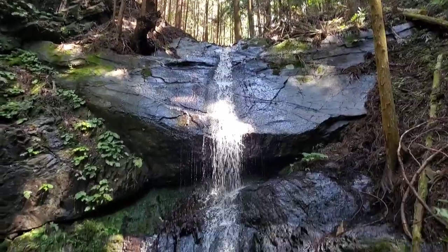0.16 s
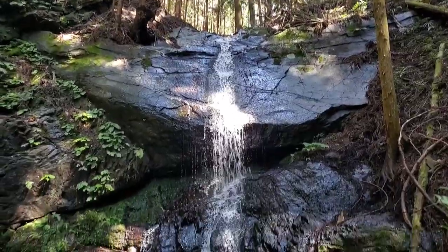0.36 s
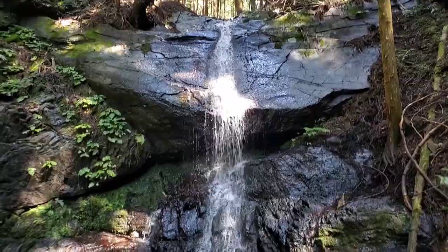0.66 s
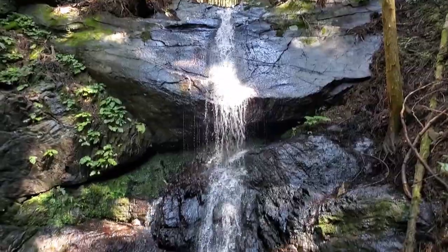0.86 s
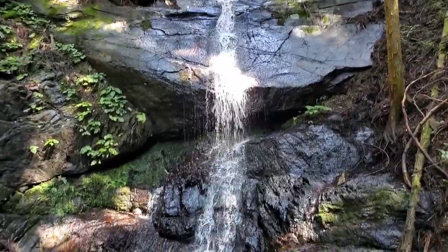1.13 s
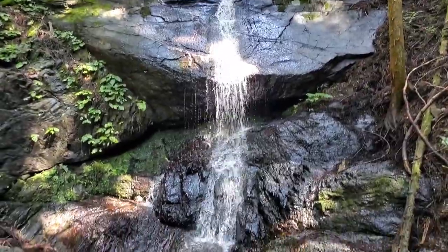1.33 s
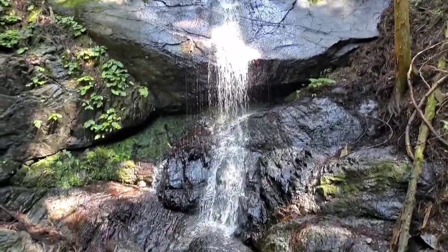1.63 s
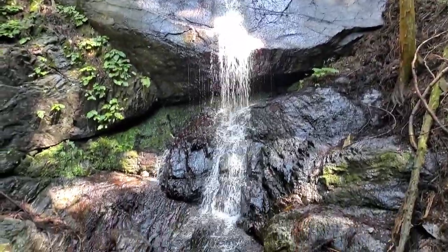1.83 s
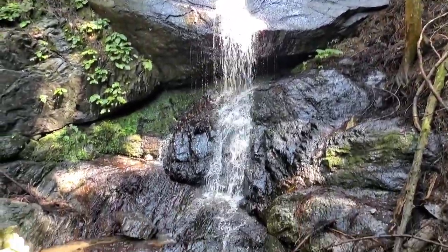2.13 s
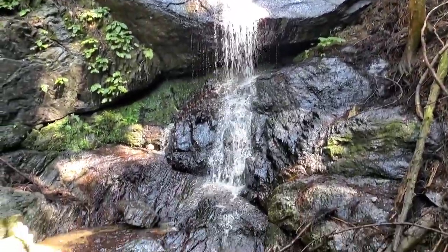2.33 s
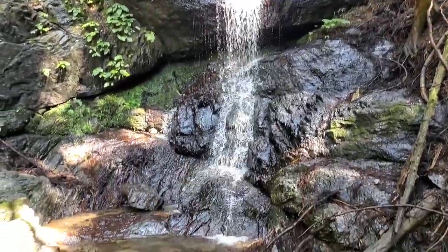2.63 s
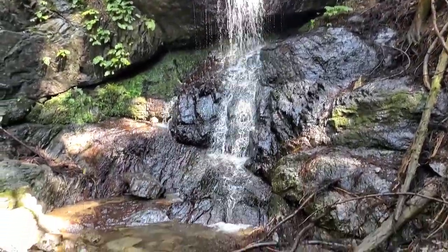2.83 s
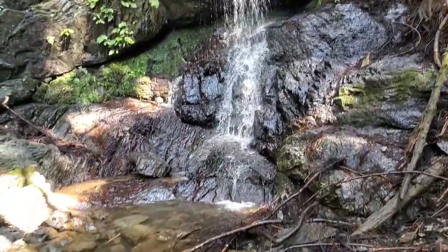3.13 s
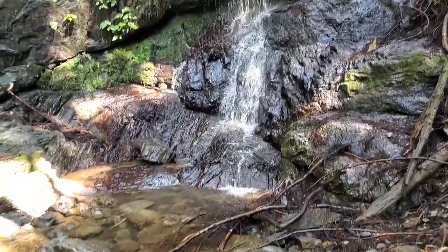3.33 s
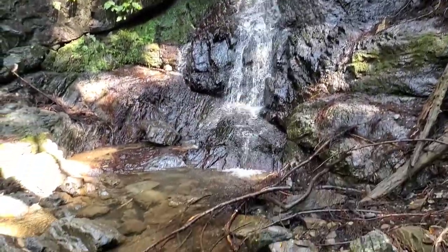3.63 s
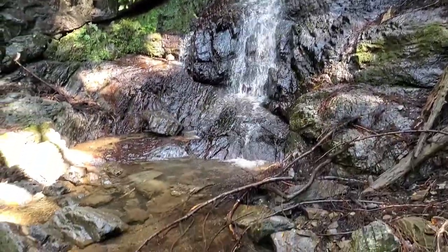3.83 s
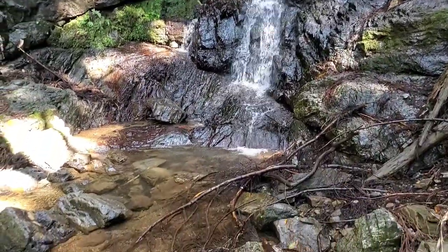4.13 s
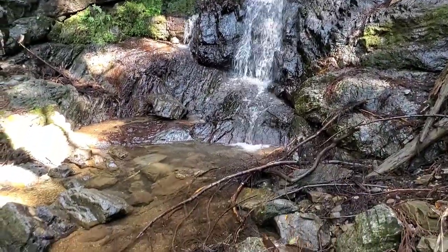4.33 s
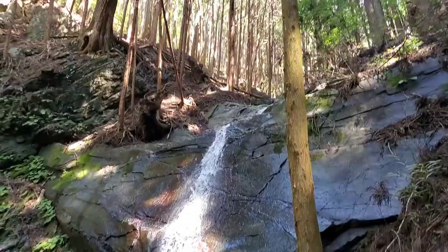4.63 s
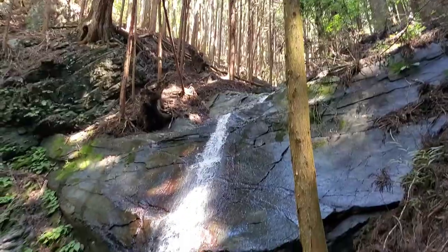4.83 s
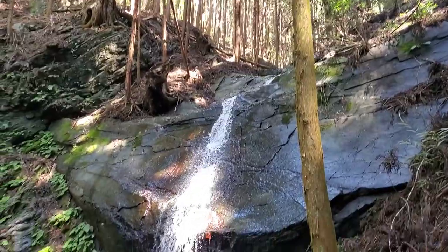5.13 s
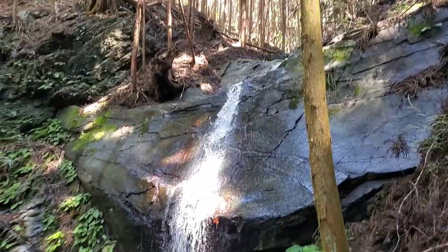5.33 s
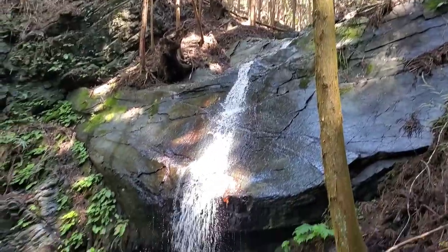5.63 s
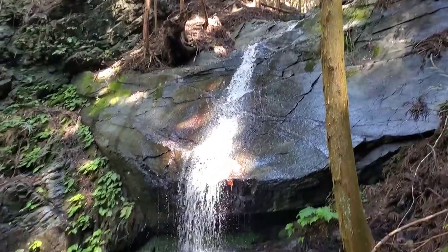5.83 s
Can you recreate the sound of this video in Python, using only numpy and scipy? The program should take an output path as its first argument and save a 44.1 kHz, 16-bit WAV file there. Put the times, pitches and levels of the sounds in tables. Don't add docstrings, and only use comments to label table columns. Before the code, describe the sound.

A small woodland waterfall heard from its pool: dense, bright splashing hiss with flickering surges, drops slapping rock, tiny clicks and a few soft low bubble thumps. Near 4.5 seconds the sound drops out for an instant and returns much quieter and thinner from the slope, then rises quickly after 5.3 seconds with faint wind. Handheld stereo microphone with automatic gain.

```python
import sys
import numpy as np
from scipy import signal
from scipy.io import wavfile
from scipy.ndimage import uniform_filter1d

SR = 44100
rng = np.random.default_rng(int(sys.argv[2]) if len(sys.argv) > 2 else 0)


def digitize_waveform(pressure):
    field = np.atleast_2d(pressure).T
    bounded = np.clip(field, -1, 1)
    quanta = np.round(bounded * 32767).astype(np.int16)
    wavfile.write(sys.argv[1], SR, quanta)


def volts(x):
    e = np.asarray(x, float) / 20
    return 10 ** e


N = 262836
SCENE_CHANGE_S = 4.5412


def waterfall():
    # hz, left_db, right_db (per Hz)
    foot_low = [(25, -37, -34), (45, -25, -21), (72, -8.5, -4.5), (110, -20, -18), (140, -10.5, -12),
                (168, -5, -1), (209, -6, -8), (250, -10.5, -4.5), (288, -9, -8), (378, -5, -2.5),
                (480, -6.5, -5), (610, -4.5, -2.0), (710, -6.5, -5), (970, -4, -2)]
    foot_high = [(1400, -1, 0), (1930, 0.5, 0.5), (2470, -2, 0.5), (2800, -3, 2.5), (3230, -2, 4),
                 (3930, -1.5, 1.5), (5060, -5, -1), (6300, -1.5, -0.5), (6880, -3.5, 2.5),
                 (7900, -6.5, -4.5), (12000, -4.5, -5.5), (13300, -5.5, -9), (14600, -3, -8),
                 (15300, -3, -8)]
    slope_low = [(25, -31.5, -28.0), (45, -28.0, -13.0), (75, -21.5, -2.5), (125, -21.0, -13.5),
                 (190, -12.5, -9.5), (260, -15.0, -12.5), (340, -14.5, -10.0), (500, -7.5, -6.5),
                 (650, -6.0, -3.5), (800, -7.5, -4.5), (1000, -5.0, -3.5)]
    slope_high = [(1600, 0.5, 0.5), (2150, 0.5, 3.0), (3000, -2.5, 2.0), (3600, -2.0, 3.0),
                  (4100, 0.5, 2.0), (4700, 0.0, 1.5), (6600, -2.0, -0.5), (7400, -6.0, -1.0),
                  (8100, -5.0, -4.0), (9600, -1.5, -2.0), (11400, -3.0, -0.5), (12600, -3.0, -3.0),
                  (14200, 0.0, -2.0), (15300, -1.0, -2.5)]
    # hz, likeness (0-1), left_lead_rad
    foot_ports = [(40, 0.6, 0.2), (80, 0.87, -0.28), (170, 0.91, 0.4), (398, 0.91, 0.51), (805, 0.43, 0.26),
                  (1100, 0.19, -0.6), (1600, 0.39, 0.81), (2100, 0.59, 0.018), (3060, 0.06, 0.6),
                  (3820, 0.4, 0.64), (4300, 0, 0.55), (6140, 0.6, -1.34), (7340, 0.14, -1.35),
                  (9500, 0.06, -0.1)]
    slope_ports = [(40, 0.06, 3), (80, 0.29, -4), (170, 0.96, 0.2), (400, 1, 0.4), (800, 0.59, 0.3),
                   (1100, 0.56, 0.5), (1500, 0.48, 1.3), (2140, 0.51, 1.5), (3050, 0.1, 2),
                   (3800, 0.28, 0.5), (4500, 0.35, 4), (6000, 0.3, 2.5), (7340, 0.23, -2),
                   (9500, 0.08, 1.5)]
    # time_s, splash_level_db
    foot_gain = [
        (0, -25.5),
        (0.7, -19.5),
        (4.52, -20),
    ]
    slope_gain = [
        (4.555, -36),
        (5.27, -36.5),
        (5.42, -29),
        (5.56, -28),
        (5.64, -26.5),
        (5.96, -25),
    ]
    fast_flicker = 0.52 * clumps(N, 1, long=500, wide=1)[0]
    slow_flicker = 0.43 * clumps(N, 1, long=2200, wide=1)[0]
    flicker = volts(fast_flicker + slow_flicker)
    water = np.array([flicker * spray() for _ in range(2)])
    hz, t, spectra = signal.stft(water, SR, nperseg=2048, noverlap=1536)
    spectra = spectra * volts(flow_db(hz, t))
    foot = heard_from(spectra, hz, foot_gain, foot_low + foot_high, foot_ports)
    slope = heard_from(spectra, hz, slope_gain, slope_low + slope_high, slope_ports)
    return volts(8.0) * np.where(np.arange(N) < SCENE_CHANGE_S * SR, foot, slope)


def spray():
    hiss = rng.standard_normal(N)
    fizz = drops(300, 3.64, 2.78, low_hz=150.6, top_hz=14120, count=24)
    gurgle = drops(45, 3.8, 8.67, low_hz=417.5, top_hz=5000, count=18)
    return evened(hiss + volts(-6) * fizz + volts(-15.5) * gurgle)


def drops(per_s, spread_db, cycles, low_hz, top_hz, count):
    out = np.zeros(N)
    for hz in np.geomspace(low_hz, top_hz, count):
        how_many = int(per_s * hz / 3000 * N / SR) + 1
        when, size = rng.random((2, 12000))[:, :how_many]
        strength = volts(spread_db * np.minimum(-np.log(size + 1e-9), 4))
        hits = np.bincount((when * N).astype(int), strength, N)
        ringing = signal.oaconvolve(hits, bubble(hz, cycles, 0.0805))[:N]
        out += evened(ringing) * np.sqrt(hz)
    return evened(out)


def bubble(hz, cycles, glide):
    turns = np.arange(int(3 * cycles * SR / hz) + 2) * hz / SR
    tone = np.sin(2 * np.pi * turns * (1 + glide * turns / cycles))
    return tone * np.exp(-turns / cycles) * (1 - np.exp(-2 * turns))


def flow_db(hz, t):
    # time_s, swell_db, half_length_s
    surges = [(0.52, 1, 0.021), (0.87, -1.5, .03), (1.05, -0.8, 0.087), (1.238, -1, 0.016),
              (1.28, 0.5, 0.018), (1.43, 1.3, 0.037), (1.806, -1.2, 0.019), (2.027, 1.1, .025),
              (2.107, -1, .025), (2.188, 1.7, .04), (2.38, 0.3, .04), (2.497, -0.2, .025),
              (2.675, .8, 0.018), (2.94, 1.1, .06), (3.46, -1.5, 0.094), (3.73, .9, 0.099),
              (3.93, -1.7, .025), (4.22, -0.5, 0.14), (5.023, 1, 0.019), (5.142, -1.5, .03),
              (5.448, 0.5, .02), (5.89, 0.5, .025)]
    # hz, share_of_surge, patch_depth_db, bass_lift_db
    ranges = [(90, 0, 1.5, 12), (150, 0.33, 1.15, 5.5), (350, 0, 1.1, 4), (600, 0, 1.5, 2),
              (1200, 0.64, 0.92, 1.5), (3500, 1.07, 0.82, 1.5), (7000, 0.9, 0.53, 1.5),
              (8500, 0.57, 0.5, 1)]
    # hz, change_db
    tipped = [
        (1200, 0.4),
        (2100, -1),
        (3200, 2.2),
        (4500, -0.5),
        (6300, -0.5),
        (8500, 0.2),
    ]
    tip_s, tip_length_s = 3.2, 1
    opening_s, opening_rise_s = 5.31, .09
    calm_share = .5
    follows, patch_db, lift_db = read(ranges, hz)
    surge_db = sum(db * np.exp(-.5 * ((t - s) / half) ** 2) for s, db, half in surges)
    tipping = read(tipped, hz)[0] * (eased(t, tip_s, tip_length_s) - .5)
    bass_lift = lift_db * (eased(t, opening_s, opening_rise_s) - calm_share)
    patches = patch_db * clumps(len(t), len(hz), long=3, wide=40)
    return follows * surge_db + patches + np.where(t < SCENE_CHANGE_S, tipping, bass_lift)


def heard_from(spectra, hz, gain, colour, ports):
    same, lead = read(ports, hz)
    same = np.clip(same, 0, 1)
    left = spectra[0] * np.exp(1j * lead)
    right = same * spectra[0] + np.sqrt(1 - same ** 2) * spectra[1]
    coloured = np.array([left, right]) * volts(read(colour, hz))
    sound = signal.istft(coloured, SR, nperseg=2048, noverlap=1536)[1][:, :N]
    return sound * volts(np.interp(np.arange(N) / SR, *np.transpose(gain)))


def slaps():
    # start_s, peak_db, pitch_hz, left_minus_right_db
    big_drops = [(0.1694, -17, 3130, -3.0), (0.185, -18, 2920, -2.0), (1.0997, -12, 2160, 6),
                 (1.2672, -12, 3400, -14), (1.3794, -14, 4760, 3), (2.229, -5, 2880, -1),
                 (4.499, -13, 2010, -5), (5.301, -26, 1600, -4), (5.386, -16, 1670, 0),
                 (5.449, -13, 1610, 3), (5.7933, -9, 3990, -1.5), (5.8854, -9, 1440, -2.0),
                 (5.935, -17, 2250, -4)]
    out, t = np.zeros((2, N)), np.arange(900) / SR
    for s, db, hz, pan_db in big_drops:
        burst = .5 * rng.standard_normal((2, len(t))) * np.exp(-t / 0.0017)
        ring = np.pad(bubble(hz, 3.7, 0.052), (0, len(t)))[:len(t)]
        add(out, s, panned(db - 4.5, pan_db) * (1.33 * ring + 1.06 * burst))
    return out


def ticks():
    # start_s, peak_db, left_minus_right_db
    droplets = [
        (1.333, -9.5, -2.5),
        (1.5711, -9, -2.5),
        (2.3044, -12, -1),
        (4.627, -24, -4),
        (4.7024, -33, -1.0),
        (4.7614, -31, -1.0),
        (4.8794, -32, -1.5),
        (5.027, -28, -15),
        (5.0994, -33, -1.0),
        (5.8194, -16, -1.5),
    ]
    out, t = np.zeros((2, N)), np.arange(300) / SR
    for s, db, pan_db in droplets:
        ring = np.sin(2 * np.pi * 5600 * t) + 0.57 * rng.standard_normal(len(t))
        snap = ring * np.exp(-t / .0007) * (1 - np.exp(-t / .0002))
        add(out, s + .0007, panned(db + 5, pan_db) * snap)
    return out


def pool_thumps():
    # start_s, peak_db, pitch_hz
    pockets = [
        (0.07, -38, 174),
        (0.98, -26, 185),
        (4.27, -30, 166),
        (3.088, -19.5, 183),
        (4.158, -25, 207),
        (5.079, -45, 191),
        (5.395, -48, 199),
    ]
    return swells(pockets, 5.5, left_db=-5.0, right_db=-1.5)


def pool_notes():
    # start_s, peak_db, pitch_hz
    singing = [
        (0.745, -24.5, 445),
        (0.814, -23, 610),
        (4.874, -42, 576),
        (5.929, -32, 630),
    ]
    return swells(singing, 12.0, left_db=0.5, right_db=2.5)


def wind():
    # start_s, peak_db, pitch_hz
    puffs = [
        (0.16, -48, 70),
        (0.79, -43, 70),
        (3.06, -42, 72),
        (1.119, -41, 61.9),
        (2.354, -40, 64.6),
        (4.379, -36, 45.8),
        (5.519, -38, 86.1),
        (5.692, -42, 67.3),
        (5.844, -32.5, 99.6),
    ]
    return swells(puffs, 6.7, left_db=-23, right_db=-0.5)


def swells(rows, cycles, left_db, right_db):
    out = np.zeros((2, N))
    sides_db = np.array([[left_db], [right_db]])
    for s, db, hz in rows:
        t = np.arange(int(cycles * SR / hz)) / SR
        start = s - .27 * t[-1]
        add(out, start, volts(db + sides_db) * np.sin(2 * np.pi * hz * t) * np.hanning(len(t)))
    return out


def clumps(frames, bins, long, wide):
    field = rng.standard_normal((bins, frames))
    for _ in range(2):
        field = uniform_filter1d(uniform_filter1d(field, long, 1), wide, 0)
    return evened(field)


def evened(x):
    return x / np.sqrt(np.mean(abs(x) ** 2) + 1e-20)


def eased(t, s, length):
    return .5 + .5 * np.tanh((t - s) / length)


def read(points, hz):
    f, *columns = np.transpose(points)
    return np.array([np.interp(np.log(hz + 1), np.log(f + 1), c) for c in columns])[..., None]


def panned(db, pan_db):
    return volts(db + np.array([[.5], [-.5]]) * pan_db)


def add(mix, s, sound):
    part = mix[:, round(s * SR):][:, :sound.shape[1]]
    part += sound[:, :part.shape[1]]


def splice(fade):
    cut_s, return_s = 4.5196, 4.5528
    drop_db, deepest_db = -13, -50
    creep_db, creep_rise = -15, 2200
    now = np.arange(N) / SR
    dying = np.maximum(drop_db - fade * (now - cut_s), deepest_db)
    creeping = creep_db - creep_rise * (return_s - now)
    dip = np.where(now < SCENE_CHANGE_S, dying, creeping)
    return volts(np.where((now < cut_s) | (now > return_s), 0, dip))


def scene():
    return waterfall() + slaps() + ticks() + pool_thumps() + pool_notes() + wind()


def low_pass(x):
    return signal.sosfilt(signal.butter(12, 16800, fs=SR, output="sos"), x)


def record(dry):
    # hz, threshold_sigmas (lower = more often)
    dropout = [
        (2500, 3.1),
        (4500, 2.7),
        (6000, 3.1),
        (8100, 1.7),
        (9500, 2.6),
        (10800, 2.0),
        (12000, 2.4),
        (13100, 1.75),
        (14500, 2.7),
    ]
    limited = 1.5 * np.tanh(dry / 1.5)
    hz, t, z = signal.stft(limited, SR, nperseg=1024, noverlap=768)
    gaps = clumps(len(t), len(hz), long=11, wide=3) > read(dropout, hz)[0]
    thinned = z * np.where(gaps, volts(-25), 1)
    gappy = signal.istft(thinned, SR, nperseg=1024, noverlap=768)[1][:, :N]
    body = signal.oaconvolve(gappy, signal.firwin(255, 4300, fs=SR)[None], "same")
    treble = gappy - body
    cut = body * splice(1500) + treble * splice(4000)
    treble_limit = signal.firwin(2047, 15500, window=("kaiser", 10), fs=SR)
    banded = signal.oaconvolve(cut, treble_limit[None], "same")
    return low_pass(banded)


dry = scene()
out = record(dry)
digitize_waveform(out)
```